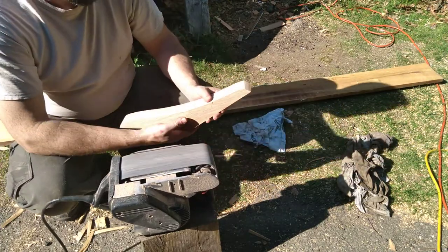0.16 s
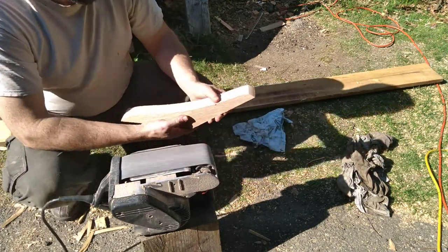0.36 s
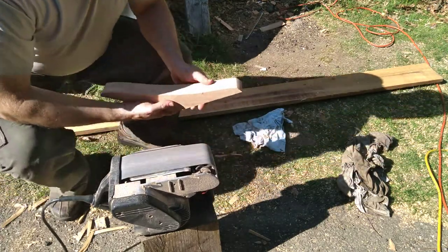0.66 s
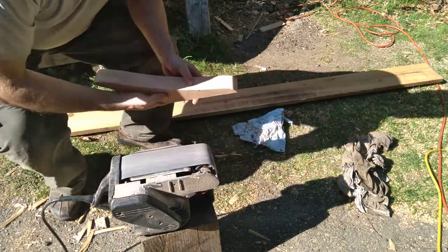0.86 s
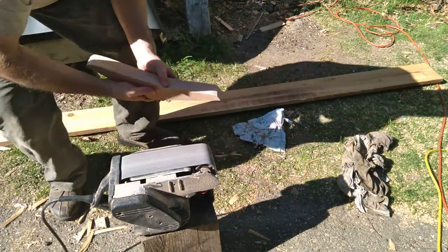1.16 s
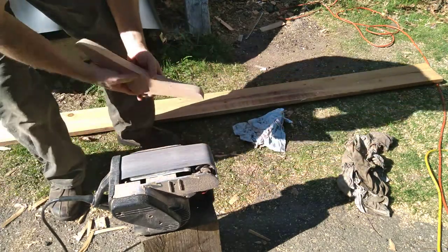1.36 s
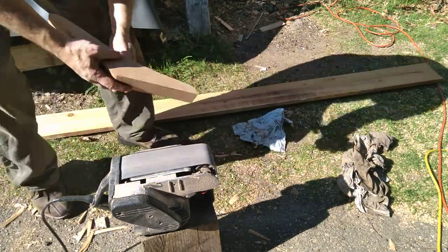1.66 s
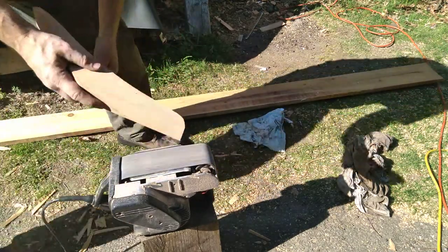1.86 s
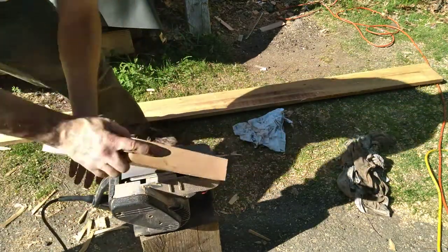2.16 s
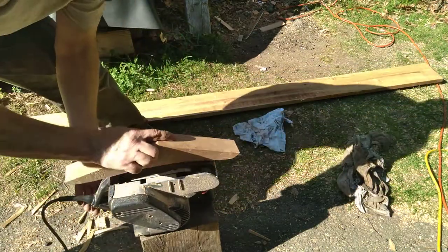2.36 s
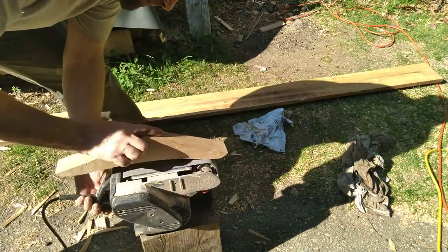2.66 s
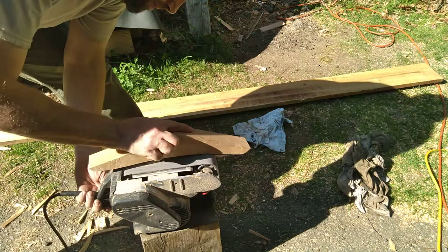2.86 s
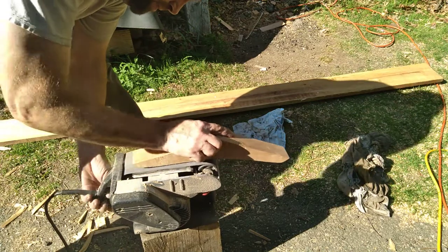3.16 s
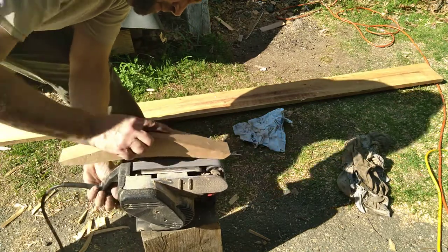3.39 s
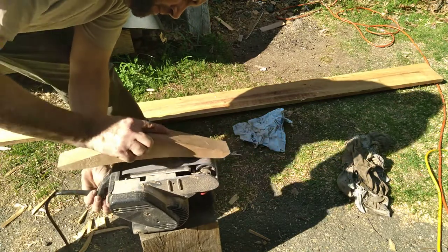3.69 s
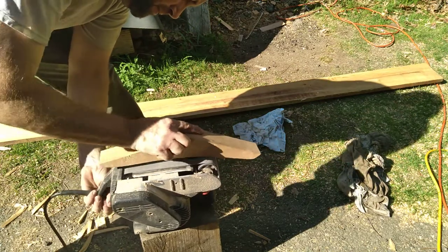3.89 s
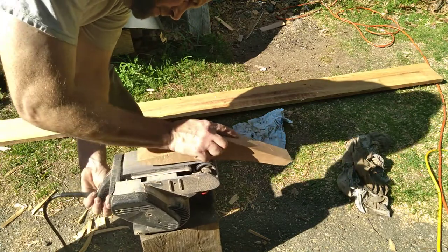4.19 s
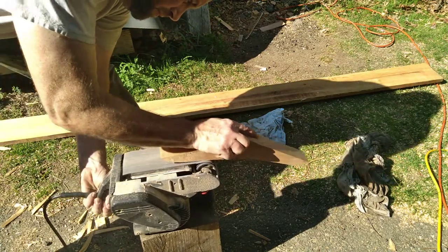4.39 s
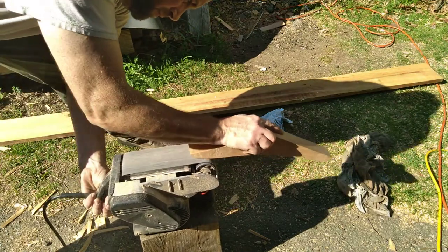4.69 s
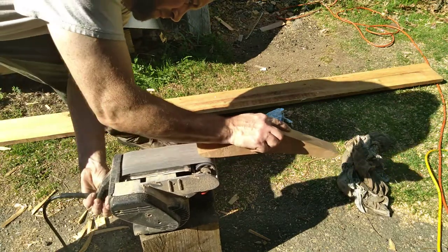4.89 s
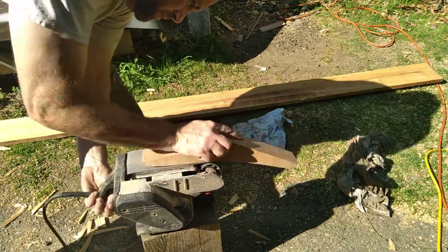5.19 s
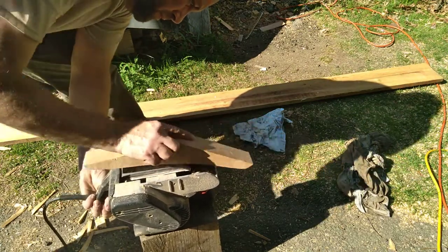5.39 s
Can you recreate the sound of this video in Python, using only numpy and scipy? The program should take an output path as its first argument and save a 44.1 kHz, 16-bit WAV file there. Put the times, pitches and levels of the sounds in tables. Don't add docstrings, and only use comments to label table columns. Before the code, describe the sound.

A belt sander is already running outdoors, heard dry and loud from an arm's length on a close pair of microphones, and it never stops. Its sound is a dense, bright hiss of air, bearings and belt, strongest around 7 to 10 kHz, topped by a shrill whine near 14 kHz, a rough gear tone near 7 kHz and a fainter fan tone near 11 kHz. From 0 to 2.5 seconds it spins freely, nearly constant in pitch, with small shifts in hiss and balance. Around 2.6 to 3.2 seconds wood is pressed on the belt: the pitch sags by a few percent, and a faint hum near 1.6 kHz and pulley tones emerge. From 3.2 to 5.5 seconds the gear whine grows stronger and cleaner, mostly left, while the top whine swings between sides. Tiny dips mark snags near 3.2, 4.7 and 5.4 seconds; pitch recovers slightly at the end.

```python
import sys
import numpy as np
from scipy import signal
from scipy.io import wavfile
from scipy.ndimage import uniform_filter1d

SR = 44100
rng = np.random.default_rng(int(sys.argv[2]) if len(sys.argv) > 2 else 0)


def invert_db(x):
    u = np.asarray(x, float) / 20
    return 10 ** u


def output_pcm(signal):
    pcm = np.clip(np.atleast_2d(signal).T, -1, 1) * 32767
    wavfile.write(sys.argv[1], SR, np.round(pcm).astype(np.int16))


N = 244297

LOAD_START_HZ, SAG_HZ = 407.6, 9.6
GEAR_TEETH, FAN_BLADES = 17, 27
CONVERTER_RATE = 48000
SWAY_PER_S = 5
RUSH_SWAY_DB, RUMBLE_SWAY_DB = 1.25, 1.07
RUMBLE_SAG_DB = -1.5

# (time [s], speed [turns/s])
SHAFT_SPEED = [(0, 412.1), (.68, 411.3), (1.1, 411.38), (1.7, 412.28), (2.42, 412.65), (2.6, 411.3),
               (3.1, 401.5), (3.32, 400.8), (3.52, 402.7), (3.72, 402.9), (4.0, 398.7), (4.4, 395.1),
               (4.65, 396.9), (4.9, 399.7), (5.05, 399.9), (5.17, 396.7), (5.32, 396.3), (5.54, 400.4)]
# (time [s], left level [dB], right level [dB], left lead [rad])
MESH_PATH = [(0, -20, -16.5, -2), (.4, -19, -25.5, -0.5), (.8, -22.5, -22, 1.5), (1.2, -21.5, -26, 0),
             (1.6, -22, -18, -2), (2.4, -22, -19, -2), (2.62, -19, -20.5, -0.3), (2.98, -18, -25, 1.3),
             (3.16, -19, -22.5, -4), (3.44, -13, -27.5, -5), (3.68, -15, -16, -2), (3.95, -9.6, -25.5, -4),
             (4.2, -9.5, -16, -4), (4.45, -12.5, -25, -5), (4.72, -8.5, -14.5, -4),
             (5.02, -7.5, -22.5, -2.5), (5.24, -10.5, -14, -4.5), (5.46, -7.5, -17.5, -3.5)]
OCTAVE_PATH = [(.35, -7.5, -10, -.4), (1.02, -6, -16, -0.5), (1.38, -7.1, -10.5, 0.5),
               (2.42, -7, -16.5, 0.8), (2.57, -8, -12.5, 0.3), (2.86, -9.5, -24, 0), (2.97, -13, -21, 0.3),
               (3.08, -20, -21, 3.7), (3.32, -15, -13.5, 4.4), (3.54, -17, -19, 4.5), (3.74, -13, -18, 4.6),
               (3.94, -16, -11.5, 5), (4.16, -11, -9.5, 5.5), (4.4, -15.5, -12.5, 5.5),
               (4.64, -11, -10, 5.5), (4.87, -17.5, -12, 4.6), (5.38, -10, -9.5, 5.1),
               (5.54, -25, -13.7, 4)]
FAN_PATH = [(0, -30, -18.5, -.7), (.8, -29, -23.5, -.7), (1.5, -31, -19.5, -.6), (2.45, -32, -19.5, -.5),
            (2.75, -35, -23.5, -.7), (3.4, -29, -26, .4), (3.9, -33, -24, -0.4), (4.5, -45, -22.5, -.6),
            (5.54, -40, -34, .3)]
# (multiple of shaft speed [1], idle left level [dB], idle right level [dB],
# loaded left level [dB], loaded right level [dB])
WEAK_ORDERS = [(7, -58, -60, -44, -58), (8, -58, -60, -49, -58), (31 / 3, -58, -60, -46, -58),
               (12, -58, -60, -43, -58), (18, -41, -50, -37, -42), (33, -45, -55, -41, -54),
               (35, -52, -48, -48, -54), (36.29, -56, -58, -46, -56)]
# (middle time [s], length [s], left level [dB], right level [dB])
FOLDED_SWELLS = [
    (0, 0.25, -37.5, -49),
    (.4, .2, -53, -52),
    (.8, 0.14, -42, -44),
    (1.2, 0.14, -39.5, -45),
    (2.64, 0.083, -43, -41),
    (4.44, 0.078, -38, -48),
]
# (frequency [Hz], level [dB per Hz])
HISS_LEFT = [(20, -92), (40, -80.5), (110, -64.5), (400, -67), (1000, -64.3), (3000, -63.6), (5500, -62.8),
             (7500, -56.5), (8800, -58), (9500, -56.5), (10400, -60.5), (12200, -63), (13500, -62),
             (15800, -61)]
HISS_RIGHT = [(20, -91), (40, -80), (110, -65.5), (450, -64.5), (1000, -64.5), (3000, -63.9), (5500, -64.3),
              (7500, -60), (8900, -57.7), (9900, -52), (10500, -53.3), (11600, -59), (13000, -62),
              (15800, -63)]
# (frequency [Hz], left lead [rad])
HISS_LIKENESS = [(60, .06), (1200, .18), (4000, .1), (7500, .25), (10000, .5), (15000, .35)]
HISS_LEAD = [(60, 0), (3600, -3), (9800, -0.42), (15000, 3)]
# (time [s], length [s], centre [Hz], width [Hz], level [dB])
HOLLOWS = [(0.538, 0.083, 227, 90, 5), (.8, 0.21, 940, 70, 9), (1.697, 0.41, 510, 28, 7.5),
           (1.65, 0.16, 1720, 130, 11), (2, 0.13, 1650, 60, 11), (2.2, 0.14, 340, 40, 13.5),
           (2.35, 0.39, 507, 59, 9), (2.4, .12, 1030, 80, 9.5), (2.66, 0.078, 544, 70, 7.5),
           (2.798, 0.071, 334, 60, 8), (2.902, 0.064, 1660, 100, 9), (3.4, 0.084, 780, 200, 7),
           (5.1, .08, 550, 90, 6), (5.453, 0.087, 330, 80, 9)]
# (middle time [s], length [s], left level [dB], right level [dB])
DRIVE_SWELLS = [
    (0, .6, -57, -46),
    (2.8, .2, -54, -39),
    (3.35, 0.12, -37, -56),
    (3.8, .3, -51, -42),
    (4.4, 0.12, -58, -34.5),
    (4.95, 0.41, -43, -53),
    (5.25, 0.14, -53, -40.5),
]
DRIVE_SIDE_SWELLS = [
    (0, .4, -49, -69),
    (3.25, 0.39, -39.5, -57),
    (3.95, 0.22, -41.5, -47),
    (4.95, 0.25, -39, -54),
    (5.45, .3, -46, -53),
]
# (time [s], belt rush level [dB], left over right [dB])
ARM = [(0, 1.5, 2), (.9, -1, -0.5), (1.9, 0, 2.5), (2.6, 0, 2.5), (3.0, 0, -3), (3.2, 0.5, 6),
       (3.65, 1.5, -3.5), (4.0, .5, 2.5), (4.4, -2.5, -5.5), (5.0, 1.2, -1), (5.54, -1, -0.5)]
# (time [s], length [s], level [dB])
SNAGS = [
    (3.202, .05, -8),
    (3.55, .03, -5),
    (2.415, .03, -2),
    (4.19, .025, -4.5),
    (4.682, 0.057, -5),
    (5.164, 0.026, -6),
    (5.355, 0.013, -11),
    (5.396, 0.011, -24),
]


def evened(x):
    return x / np.sqrt(np.mean(abs(x) ** 2) + 1e-20)


def read(points, hz):
    f, value = np.transpose(points)
    return np.interp(np.log(hz + 1), np.log(f + 1), value)


def follow(rows, t):
    s, *columns = np.transpose(rows)
    return np.array([np.interp(t, s, c) for c in columns])


def sway(t):
    rates = np.geomspace(.5, SWAY_PER_S, 20)
    return evened(sum(np.sin(2 * np.pi * (f * t + rng.random())) / np.sqrt(f) for f in rates))


def swells(rows, t):
    power = 0
    for s, length, left_db, right_db in rows:
        power = power + invert_db([[left_db], [right_db]]) ** 2 * np.exp(-((t - s) / length) ** 2)
    return np.sqrt(2 * power)


def tremble(width_hz, centre_hz=0):
    hz = np.fft.fftfreq(N, 1 / SR)
    z = rng.standard_normal((2, N)) + 1j * rng.standard_normal((2, N))
    return evened(np.fft.ifft(z / (1 + ((abs(hz) - centre_hz) / width_hz) ** 2)))


def tone(turns, path, shake):
    left_db, right_db, lead = follow(path, np.arange(N) / SR)
    carrier = np.exp(2j * np.pi * turns + .5j * np.array([lead, -lead]))
    return np.sqrt(2) * invert_db([left_db, right_db]) * (carrier * (1 + shake)).real


def hiss(load):
    frames, hz = N // 256 + 5, np.fft.rfftfreq(1024, 1 / SR)
    t = np.arange(frames) * 256 / SR
    a, b, c, d, p, q = rng.standard_normal((frames, 513, 6)).T
    patches = uniform_filter1d(np.array([p, q]), 5, axis=1)
    patches = evened(uniform_filter1d(patches, 40, axis=2))

    left, other = a + 1j * b, c + 1j * d
    same = np.clip(read(HISS_LIKENESS, hz), -1, 1)[:, None]
    turned_left = left * np.exp(1j * read(HISS_LEAD, hz))[:, None]
    z = np.array([turned_left, same * left + np.sqrt(1 - same ** 2) * other])

    rush_db, rush_pan = follow(ARM, t) + RUSH_SWAY_DB * np.array([sway(t), 2 * sway(t)])
    pressed = np.interp(t, np.arange(N) / SR, load) - load.mean()
    low_db = RUMBLE_SAG_DB * pressed + RUMBLE_SWAY_DB * sway(t)
    low_pan = 2 * RUMBLE_SWAY_DB * sway(t)

    sides = np.array([.5, -.5])[:, None, None]
    high = np.exp(-.5 * ((hz[:, None] - 9200) / 2200) ** 2)
    low = 1 / (1 + (hz[:, None] / 1100) ** 4)
    level_db = np.array([read(HISS_LEFT, hz), read(HISS_RIGHT, hz)])[:, :, None] + 1.3 * patches
    level_db = level_db + high * (rush_db + sides * rush_pan) + low * (low_db + sides * low_pan)
    for s, length, centre_hz, width_hz, db in HOLLOWS:
        near = ((t - s) / length) ** 2 + ((hz[:, None] - centre_hz) / width_hz) ** 2
        level_db[1] += db * np.exp(-near)

    unit = np.std(signal.istft(left, nperseg=1024, noverlap=768)[1])
    sound = signal.istft(z * invert_db(level_db), nperseg=1024, noverlap=768)[1][:, :N]
    return sound * np.sqrt(SR / 2) / unit


def weak_orders(turns, load):
    out = np.zeros((2, N))
    for order, *levels in WEAK_ORDERS:
        idle_db, loaded_db = np.reshape(levels, (2, 2, 1))
        level_db = idle_db + (loaded_db - idle_db) * np.minimum(2 * load, 1)
        waver = 1 + .5 * tremble(width_hz=3.4)
        out += invert_db(level_db) * (waver * np.exp(2j * np.pi * order * turns)).real
    return np.sqrt(2) * out


def folded(turns):
    t = np.arange(N) / SR
    beat = np.exp(2j * np.pi * (7 * GEAR_TEETH * turns - CONVERTER_RATE * t))
    return swells(FOLDED_SWELLS, t) * (beat * (1 + 0.89 * tremble(width_hz=36))).real


def drive(turns):
    t = np.arange(N) / SR
    hum, below, above = (np.exp(2j * np.pi * order * turns) * (1 + .4 * tremble(width_hz=4))
                         for order in (4, 11 / 3, 13 / 3))
    return (swells(DRIVE_SWELLS, t) * hum + swells(DRIVE_SIDE_SWELLS, t) * (below + above)).real


def whine(turns, load):
    t = np.arange(N) / SR
    mesh_shake = .42 * tremble(width_hz=36) + .13 * tremble(width_hz=5)
    mesh = tone(GEAR_TEETH * turns, MESH_PATH, (1 - .6 * load) * mesh_shake)
    snag_db = sum(db * np.exp(-((t - s) / length) ** 2) for s, length, db in SNAGS)

    octave_shake = np.array([[.19], [.26]]) * tremble(width_hz=55) + .11 * tremble(width_hz=4)
    pulley = .05 * tremble(width_hz=9, centre_hz=115)
    octave = tone(2 * GEAR_TEETH * turns, OCTAVE_PATH, octave_shake + pulley)
    fan = tone(FAN_BLADES * turns, FAN_PATH, .5 * tremble(width_hz=35))
    return mesh * invert_db(snag_db) + octave + fan


def scene():
    speed = follow(SHAFT_SPEED, np.arange(N) / SR)[0]
    speed = uniform_filter1d(speed, 5000, mode="nearest")
    turns = np.cumsum(speed) / SR
    load = np.clip((LOAD_START_HZ - speed) / SAG_HZ, 0, 1)
    return hiss(load) + weak_orders(turns, load) + folded(turns) + drive(turns) + whine(turns, load)


def low_pass(x):
    return signal.sosfilt(signal.butter(12, 15880, fs=SR, output="sos"), x)


def record(dry):
    fast = signal.resample_poly(dry, 160, 147, axis=1)
    knee, room = .52, .3
    over = np.maximum(abs(fast) - knee, 0)
    rounded = fast - np.sign(fast) * (over - room * np.tanh(over / room))
    soft = signal.resample_poly(rounded, 147, 160, axis=1)[:, :N]
    soft = signal.sosfilt(signal.butter(2, 28, "high", fs=SR, output="sos"), soft)
    band_limit = signal.firwin(1023, 15760, window=("kaiser", 9), fs=SR)
    mix = signal.oaconvolve(soft, band_limit[None], "same")
    return low_pass(mix)


dry = scene()
out = record(dry)
output_pcm(out)
```